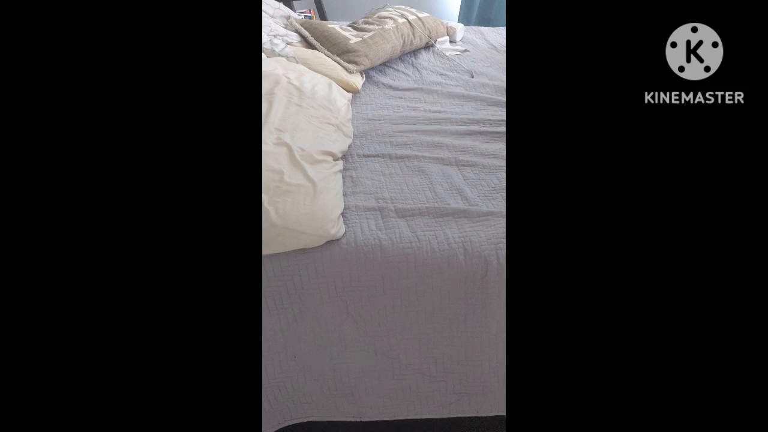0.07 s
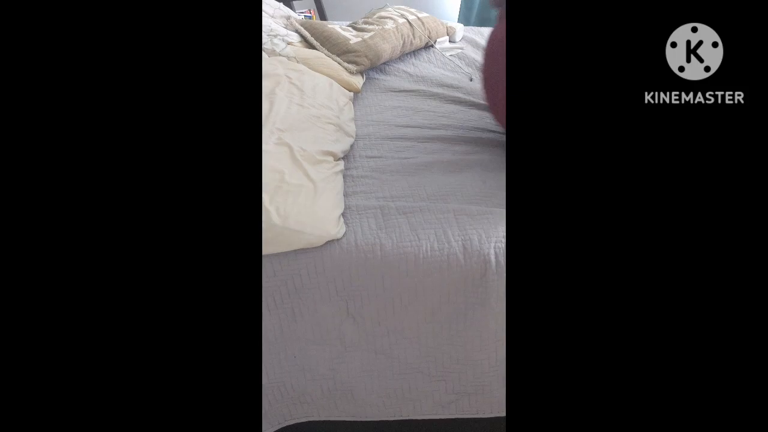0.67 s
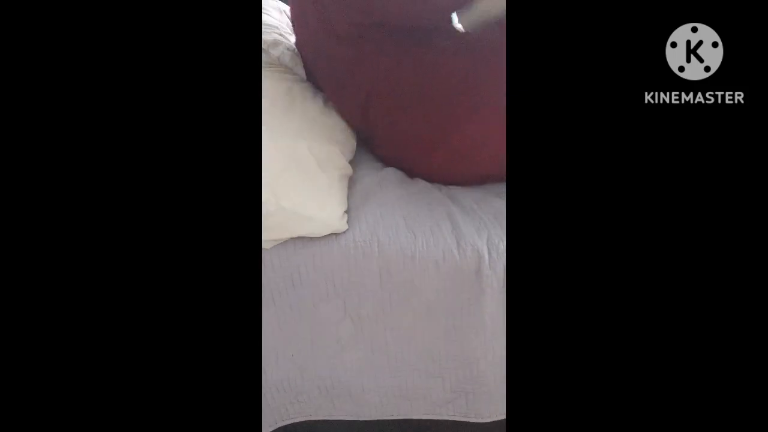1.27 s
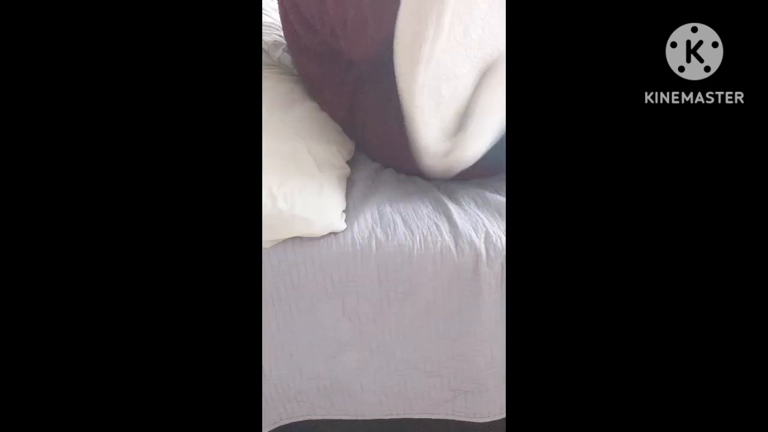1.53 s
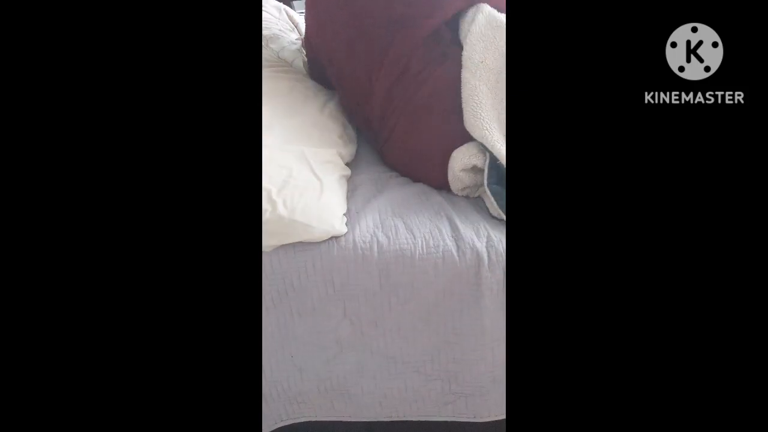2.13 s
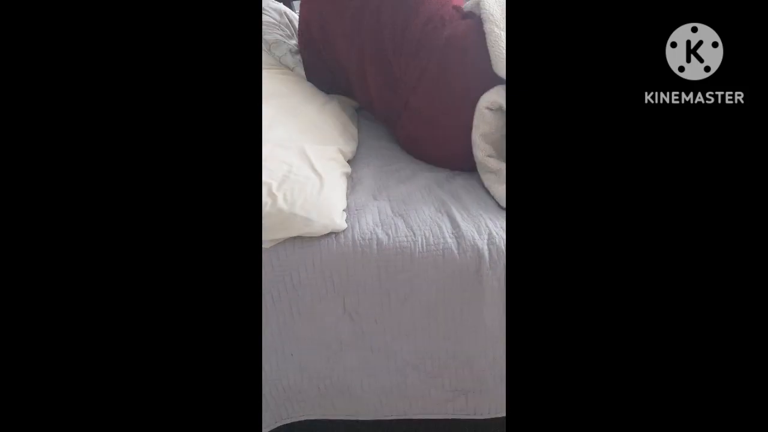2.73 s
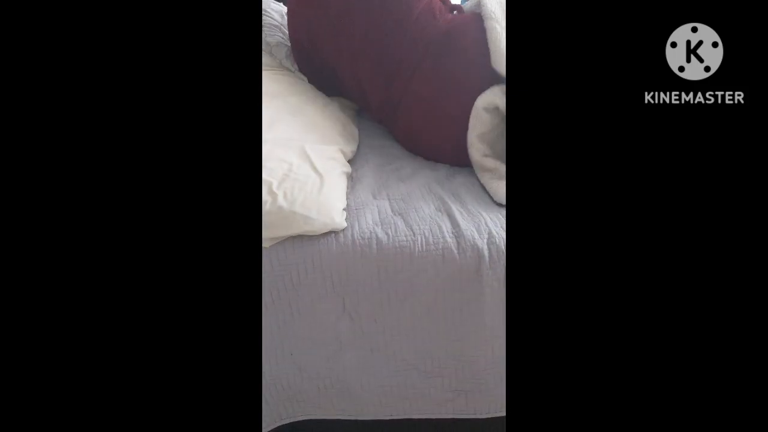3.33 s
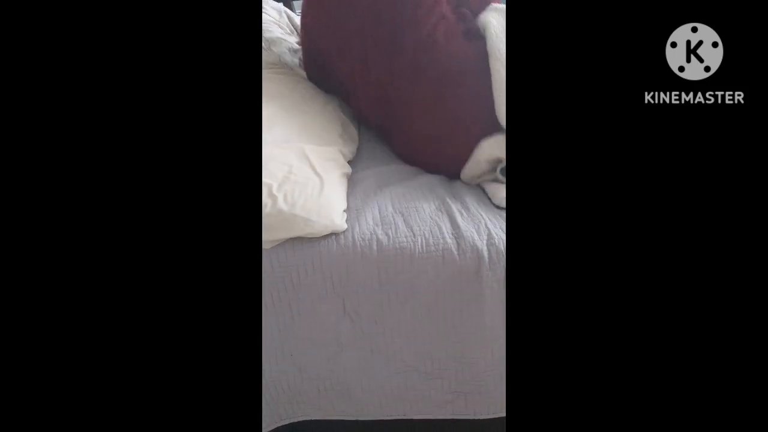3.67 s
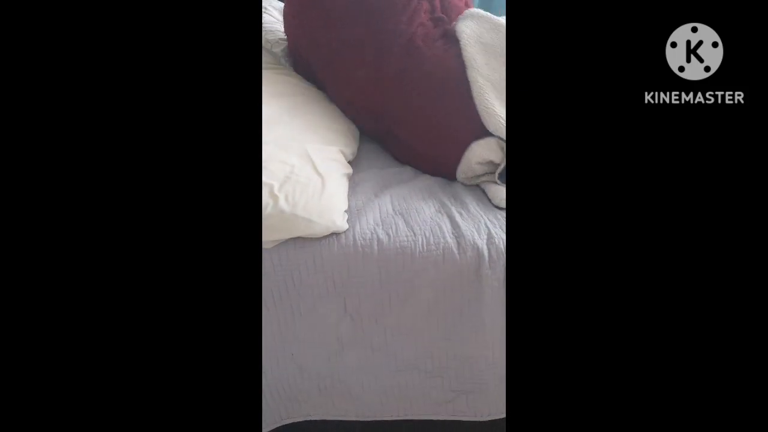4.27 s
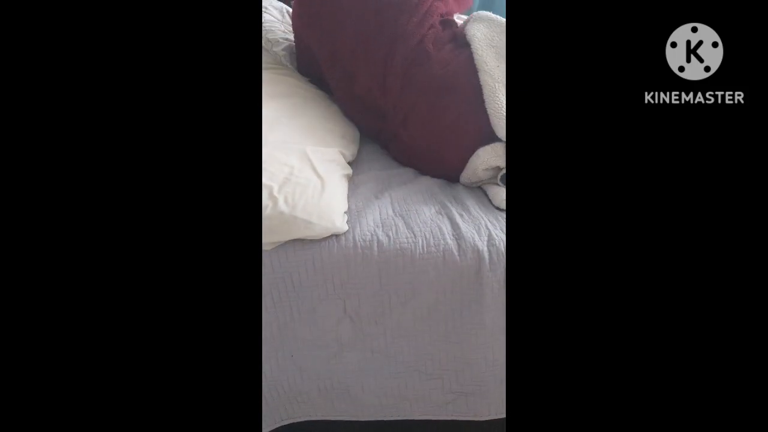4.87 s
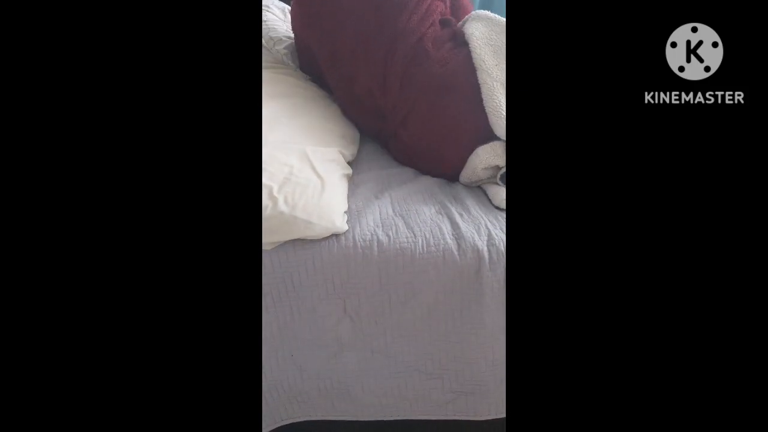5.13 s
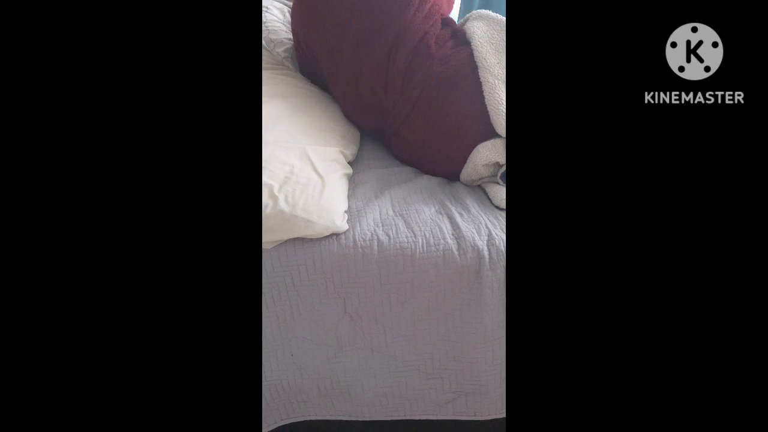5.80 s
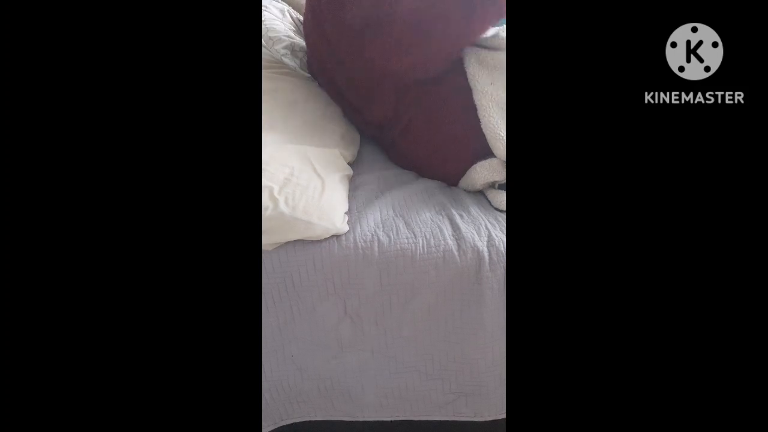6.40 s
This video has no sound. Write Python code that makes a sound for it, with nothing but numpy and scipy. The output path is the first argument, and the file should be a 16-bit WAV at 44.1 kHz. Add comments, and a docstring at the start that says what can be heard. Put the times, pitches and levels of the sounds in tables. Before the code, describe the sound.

In a quiet room, a person shifts on soft bedding, lands with a sudden thump, and the bed frame ticks faintly.

```python
"""Ventilation murmurs in a quiet room and sheets slide as someone settles on a bed.
Limbs brush and hands pat the bedding, the frame ticks, the mattress heaves under shifting weight.
One hard slap on the covers leads into the heavy thump of a body landing; a spring rings faintly.
Cloth and ticks are shaped noise dying away in the room; loads on the mattress ring the bed's modes.
Two close microphone ports beside the bed pick it all up."""
import sys
import numpy as np
from scipy import signal
from scipy.fft import rfft, irfft, next_fast_len
from scipy.io import wavfile
from scipy.ndimage import uniform_filter1d, map_coordinates

SR = 44100
rng = np.random.default_rng(int(sys.argv[2]) if len(sys.argv) > 2 else 0)


def master(y):
    """Save y as 16-bit WAV."""
    cut = np.clip(np.atleast_2d(y).T, -1, 1)
    pcm = np.round(cut * 32767)  # scale
    wavfile.write(sys.argv[1], SR, pcm.astype(np.int16))


N = 287532

# Noise spectra. Each row: frequency in Hz, relative density in dB.
AIR_DB = [(25, -23), (52, 1.5), (64, -8), (85, -12), (120, -5.5), (170, 0), (240, -2.5), (320, 1),
          (500, -9.5), (750, -19), (1500, -24.5), (2500, -28.5), (4000, -33), (11000, -43.5), (15500, -44)]
RUB_DB = [(200, 19), (500, -0.5), (1300, 1), (2800, 0.5), (4500, -5.5), (9000, -65)]
FIBRE_HISS_DB = [(1500, -19.5), (4000, 0), (6500, 1), (9000, 0), (11500, 3), (15500, -4)]
DULL_BODY_DB = [(50, -17), (130, 1), (280, -0.5), (580, -7), (900, -14), (2000, -80)]
COVER_SMACK_DB = [(300, -1), (750, -3), (1500, 1), (2500, -1), (4000, -8), (6000, -13.5), (12000, -32)]
PADDING_DB = [(35, -12), (52, -2.5), (80, 2), (105, -6), (140, 0.5), (200, -3.5), (300, -18.5), (600, -33),
              (1500, -51)]
# Cloth sliding, one list before the thump, one after. Each row: time in seconds, level in dB.
SLIDES = [
    [(0.33, -68), (0.4, -67.5), (0.83, -66.5), (1.2, -59), (1.93, -65.5), (2.19, -70), (2.51, -68),
     (2.67, -61.5), (3.48, -67)],
    [(4.1, -63.5), (4.75, -71), (4.95, -77.5), (5.26, -72.5), (5.37, -70.5), (5.89, -68.5), (6.02, -79.5),
     (6.34, -73), (6.5, -68)],
]
# Slow strokes on the covers. Each row: start in seconds, level in dB, relative hiss in dB,
# rise in seconds.
STROKES = [(.335, -61.5, -20, 0.017), (1.02, -63, -4, 0.056), (1.225, -53, -7, 0.063),
           (1.655, -66.5, 10, 0.064), (2.495, -61, 15.5, 0.024), (2.54, -61.5, 11.5, 0.046),
           (3.161, -70, 12.5, 0.039), (3.409, -64.5, -3, .03), (4.21, -61, -1, 0.058),
           (4.635, -54.5, -2, 0.028), (4.76, -61, -8, 0.037), (5.45, -56.5, -16, 0.042),
           (5.93, -63, -4, .06)]
# Quick pats. Each row: start in seconds, level in dB, relative body in dB, relative hiss in dB.
PATS = [(.769, -55, 2, -3), (1.454, -51, 4, -2.5), (1.876, -51.5, 1.5, -6), (1.978, -55, 4, -9),
        (2.106, -55.5, 4.5, -0.5), (2.483, -51.5, 9, 0), (2.722, -59, 8, 2), (2.954, -54.5, 8.5, -4.5),
        (3.829, -43, 4.5, -6.5), (3.976, -47.5, -1, 0), (4.49, -60, 4, -12), (4.855, -46, 0, -7.5),
        (5.208, -44.5, 1.5, -5.5), (5.341, -41.5, -7, -13.5), (5.559, -59, 15.5, -2)]
# Frame ticks and knocks. Each row: start in seconds, level in dB, centre in Hz.
TICKS = [(1.461, -40.5, 2320), (1.883, -44.5, 2450), (2.929, -48, 2760), (2.957, -46, 620),
         (3.835, -34.5, 564), (3.928, -41.5, 2160), (3.989, -38.5, 2660), (5.348, -30.5, 3640),
         (5.513, -48, 2080), (5.63, -53, 1510)]
# Weight on the mattress. Each row: deepest moment in seconds, level in dB, pitch in Hz.
LOADS = [(1.507, -44, 80), (1.762, -50, 91.5), (3.32, -48, 147), (3.564, -19, 76), (3.647, -18.5, 87),
         (3.676, -9, 134.4), (4.28, -46.5, 168), (4.676, -40.5, 180), (4.866, -43.5, 219),
         (5.573, -37.5, 203), (5.947, -37.5, 166)]
# Mattress and frame modes. Each row: frequency in Hz, gain in dB, T60 in seconds.
BED_MODES = [(51.2, -9, 0.61), (78.4, -13, .38), (131.6, -11.5, 0.13), (161.8, -18, 0.41), (206, -20, 0.45),
             (246.4, -16.5, 0.27)]
# The slap, palm then forearm. Each row: start in seconds, level in dB, relative body in dB,
# relative hiss in dB, rise in seconds, T60 in seconds.
SLAP_BLOWS = [(3.513, -27.5, 8.5, -2.5, 0.0069, 0.088), (3.527, -25, 10, -6.5, 0.00078, 0.043),
              (3.549, -27, 6, -21, 0.0103, 0.046)]
# Resonances under the slap. Each row: centre in Hz, width in Hz, boost in dB.
HOLLOWS = [(317, 19.4, 10.5), (392, 11, 7.5), (578, 19, 10.5), (750, 33, 4.5), (842, 8.4, 5),
           (1075, 48, 9.5), (1347, 95, 9), (1687, 35, 7.5), (1935, 33, 5.5), (2300, 45, 5.5), (2530, 37, 4),
           (3000, 20, 4), (3860, 46, 9.5), (6460, 1900, 4)]
# The body lands, first touch then full weight. Each row: start in seconds, level in dB, rise in seconds.
LANDINGS = [(3.52, -25, 0.019), (3.615, -18, 0.034)]
# Steel spring modes. Each row: frequency in Hz, level in dB, T60 in seconds.
SPRING_MODES = [(4285, -65, .9), (7700, -55, 0.7), (10700, -67, 0.7), (12300, -68, .45)]
# Room decay. Each row: frequency in Hz, T60 in seconds.
ROOM_T60_S = [(100, 0.49), (450, 0.39), (1300, 0.42), (4000, 0.25), (14000, 0.38)]
# Stereo width. Each row: frequency in Hz, side gain in dB.
SIDE_GAIN_DB = [(40, -16.5), (130, -11), (420, -8.5), (800, -4), (1300, 2.5), (2500, -0.5), (15000, 0.5)]
# Stereo balance. Each row: frequency in Hz, left over right in dB.
LEFT_LEAN_DB = [(50, 1.5), (180, -2), (450, -3), (1000, 0), (3000, 2), (8000, 4), (14000, 3.5)]
# Opening fade. Each row: time in seconds, gain in dB.
FADE_IN_DB = [(0, -91), (.11, -52), (.15, -15), (.23, 0)]


def amp(db):
    """Decibels to gain."""
    return 10 ** (np.asarray(db) / 20)


def unit_rms(x):
    """x at rms 1."""
    return x / np.sqrt(np.mean(x ** 2) + 1e-20)


def at_hz(rows, hz):
    """Interpolate (Hz, value) rows on a log axis."""
    knots_hz, values = np.transpose(rows)
    return np.interp(np.log(hz + 1), np.log(knots_hz + 1), values)


def per_sample(rows):
    """Interpolate (seconds, value) rows over the scene."""
    return np.interp(np.arange(N) / SR, *np.transpose(rows))


def wobble(rate_hz):
    """A smooth random curve, rate_hz knots a second."""
    knots = rng.standard_normal(int(N * rate_hz / SR) + 4)
    return map_coordinates(knots, [np.arange(N) * rate_hz / SR])


def filtered(x, response):
    """Apply response(hz) to the spectrum of x."""
    size = x.shape[-1]
    padded = next_fast_len(size + SR // 4)
    return irfft(rfft(x, padded) * response(np.fft.rfftfreq(padded, 1 / SR)), padded)[..., :size]


def noise(spectrum_db, size):
    """Coloured mid and side noise at rms 1."""
    return unit_rms(filtered(rng.standard_normal((2, size)), lambda hz: amp(at_hz(spectrum_db, hz))))


def add(track, start_s, sound):
    """Mix a sound into the track."""
    part = track[..., round(start_s * SR):][..., :sound.shape[-1]]
    part += sound[..., :part.shape[-1]]


def rise_and_decay(t, rise_s, t60_s):
    """Contact force: linear rise, exponential decay."""
    return np.minimum(t / rise_s, 1) * amp(-60 * np.maximum(t - rise_s, 0) / t60_s)


def ventilation(level_db=-53):
    """Moving air: a steady low murmur."""
    return amp(level_db) * noise(AIR_DB, N)


def fibres(size, left_db=1.5):
    """Cloth fibres hiss; the brushed side of the covers faces the left port."""
    mid, side = noise(FIBRE_HISS_DB, size)
    lean = np.tanh(left_db * np.log(10) / 20 / 2)
    return np.array([mid + lean * side, side + lean * mid])


def sheets(mean_rub_db=-62, flutter_db=0.5, grain_db=0.5):
    """Cloth slides in small catches that roughen rub and hiss together; both grow with the sliding."""
    slide_db = per_sample(np.vstack(SLIDES))
    rub_db = mean_rub_db + slide_db - slide_db.mean()
    catches = unit_rms(amp(flutter_db * wobble(24.88) + grain_db * wobble(700)))
    return catches * (amp(rub_db) * noise(RUB_DB, N) + amp(slide_db) * fibres(N))


def in_room(colour, force, wet_db):
    """Noise follows a contact force, then dies away in the room, each band at its own rate."""
    hz, t, bands = signal.stft(colour, SR, nperseg=128)
    direct = uniform_filter1d(force ** 2, SR // 1000)[::64]  # power per frame
    direct = np.pad(np.abs(direct), (0, len(t) - len(direct)))
    tail = amp(-120 * t / at_hz(ROOM_T60_S, hz)[:, None])  # power, hence 120
    tail /= tail.sum(1, keepdims=True)
    reverb = signal.fftconvolve(direct[None], tail, axes=1)[:, :len(t)]
    power = direct + amp(wet_db) ** 2 * reverb
    envelope = np.sqrt(np.abs(power) / power.max(1, keepdims=True))
    return signal.istft(bands * envelope, SR, nperseg=128)[1]


def cloth_blow(body_db, hiss_db, rise_s, t60_s, wet_db, crinkle_db):
    """A blow on fabric: crinkly smack of the cover, dull body of the padding, hiss of the fibres."""
    t = np.arange(SR * 2 // 3) / SR
    colour = noise(COVER_SMACK_DB, len(t))
    colour += amp(body_db) * noise(DULL_BODY_DB, len(t))
    colour += amp(hiss_db) * fibres(len(t))
    jitter = np.interp(t * 500, np.arange(400), rng.standard_normal(400))  # 500 knots a second
    crinkle = unit_rms(amp(crinkle_db * jitter))
    return in_room(colour, rise_and_decay(t, rise_s, t60_s) * crinkle, wet_db)


def strokes(body_db=7):
    """A limb brushes the covers: the sound swells with its speed and dies away."""
    out = np.zeros((2, N))
    for start_s, db, hiss_db, rise_s in STROKES:
        stroke = cloth_blow(body_db, hiss_db, rise_s, t60_s=0.27, wet_db=-3.5, crinkle_db=0.5)
        add(out, start_s, amp(db) * stroke)
    return out


def pats():
    """Hands and knees pat the bedding, all with the same quick attack and release."""
    out = np.zeros((2, N))
    for start_s, db, body_db, hiss_db in PATS:
        pat = cloth_blow(body_db, hiss_db, rise_s=0.0055, t60_s=0.19, wet_db=-3, crinkle_db=2)
        add(out, start_s, amp(db) * pat)
    return out


def frame_ticks(log_width=0.26, t60_s=0.021, reslip_s=0.0082, reslip_db=-6, reslip_ratio=1.27):
    """A frame joint lets go in a pitched snap, then slips again: later, weaker, higher."""
    out, t = np.zeros((2, N)), np.arange(SR // 2) / SR
    snap = amp(-60 * t / t60_s)
    reslips = [(start_s + reslip_s, db + reslip_db, hz * reslip_ratio) for start_s, db, hz in TICKS]
    for start_s, db, centre_hz in list(TICKS) + reslips:
        band = lambda hz: 1 / (1 + np.abs(np.log((hz + 1) / centre_hz) / log_width) ** 3)
        colour = unit_rms(filtered(rng.standard_normal((2, len(t))), band))
        add(out, start_s, amp(db) * in_room(colour, snap, wet_db=-4))
    return out


def bed_rings(push):
    """A push on the bed plus the ringing of mattress and frame."""
    t = np.arange(SR) / SR
    ring = sum(amp(db - 60 * t / t60_s) * np.cos(2 * np.pi * hz * t) * 2 * hz / SR
               for hz, db, t60_s in BED_MODES)
    return push + signal.fftconvolve(push, ring[None], axes=1)[:, :N]


def mattress(heave_s=0.036, ref_db=-20, rebound_s=0.041, rebound_ratio=0.726, wall_db=-2):
    """Each load is a soft low heave, shorter when higher or harder, with two weaker, lower rebounds."""
    heaves, t = np.zeros(N), np.arange(SR // 4) / SR
    for deepest_s, load_db, load_hz in LOADS:
        rebound_db = -8.5 + 0.2 * (load_db - ref_db)  # light loads barely bounce
        for bounce in range(3):
            db = load_db + bounce * rebound_db
            hz = load_hz * rebound_ratio ** bounce
            length_s = heave_s * np.sqrt(100 / hz) * amp(-0.23 * (db - ref_db))
            swell = np.sin(np.pi * np.minimum(t / length_s, 1)) ** 2
            heave = amp(db) * swell * np.sin(2 * np.pi * hz * (length_s / 2 - t))
            add(heaves, deepest_s + bounce * rebound_s - length_s / 2, heave)
    side_wall_echo = amp(wall_db) * np.roll(heaves, SR // 90)
    return bed_rings(np.array([heaves, side_wall_echo]))


def hollows(hz):
    """Response of the hollows of bed and room: resonant peaks in series."""
    peaks = [1 + (amp(db) - 1) * 1j * hz * width_hz / (centre_hz ** 2 - hz ** 2 + 1j * hz * width_hz)
             for centre_hz, width_hz, db in HOLLOWS]
    return np.prod(peaks, axis=0)


def slap():
    """A hard blow on the covers rings the hollows."""
    out = np.zeros((2, N))
    for start_s, db, body_db, hiss_db, rise_s, t60_s in SLAP_BLOWS:
        blow = cloth_blow(body_db, hiss_db, rise_s, t60_s, wet_db=0.5, crinkle_db=2.5)
        add(out, start_s, amp(db) * blow)
    return filtered(out, hollows)


def landing(t60_s=0.33):
    """The padding gives under the falling body with a dense low rumble."""
    out, t = np.zeros((2, N)), np.arange(SR * 2 // 3) / SR
    for start_s, db, rise_s in LANDINGS:
        add(out, start_s, amp(db) * rise_and_decay(t, rise_s, t60_s) * noise(PADDING_DB, len(t)))
    return bed_rings(out)


def spring(start_s=3.625, waver_cycles=0.13):
    """Pressed by the landing body, a mattress spring sings faintly, its pitch slightly unsteady."""
    out, t = np.zeros((2, N)), np.arange(SR) / SR
    for hz, db, t60_s in SPRING_MODES:
        cycles = hz * t + waver_cycles * wobble(92)[:SR] + rng.random((2, 1))
        add(out, start_s, amp(db - 60 * t / t60_s) * np.sin(2 * np.pi * cycles))
    return out


def scene():
    """All sources reach two close ports: alike in the bass, unrelated in the treble."""
    cloth = sheets() + pats() + strokes() + slap()
    bed = landing() + frame_ticks() + mattress() + spring()
    mid, side = cloth + bed + ventilation()
    side = filtered(side, lambda hz: amp(at_hz(SIDE_GAIN_DB, hz)))
    left_right = np.array([mid + side, mid - side])
    return filtered(left_right, lambda hz: amp(np.outer([0.5, -0.5], at_hz(LEFT_LEAN_DB, hz))))


def record(dry, low_cut_hz=34, roll_off_hz=14200, top_hz=15650):
    """The sound fades in; the microphone drops the deepest bass and the top of the treble."""
    def passband(hz):
        return (hz < top_hz) / np.sqrt(1 + (low_cut_hz / (hz + 1)) ** 10 + (hz / roll_off_hz) ** 20)
    return filtered(dry * amp(per_sample(FADE_IN_DB)), passband)


dry = scene()
out = record(dry)
master(out)
```